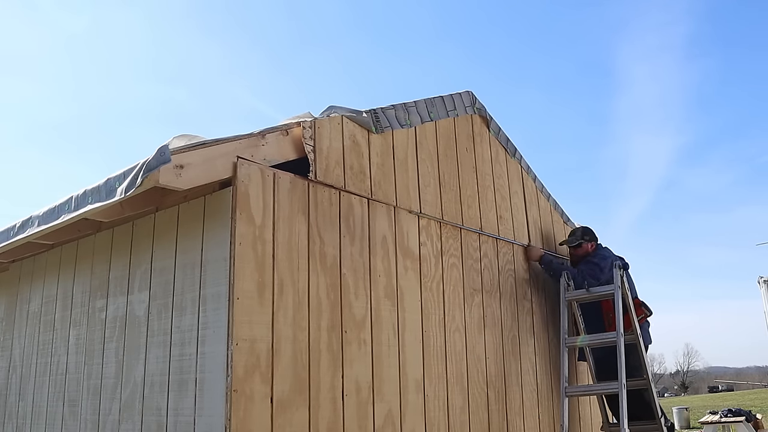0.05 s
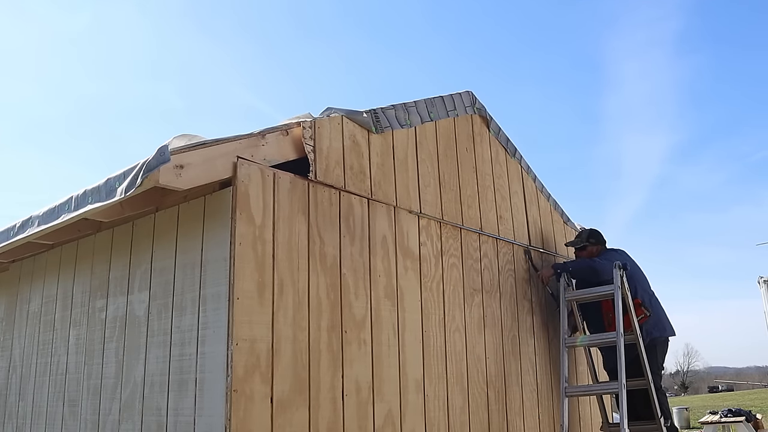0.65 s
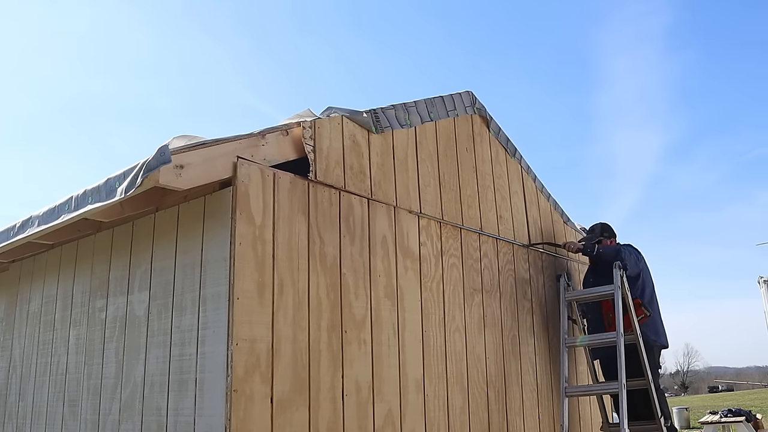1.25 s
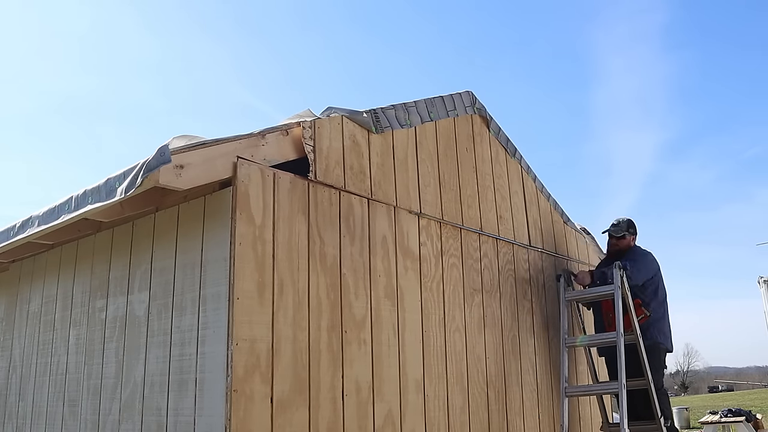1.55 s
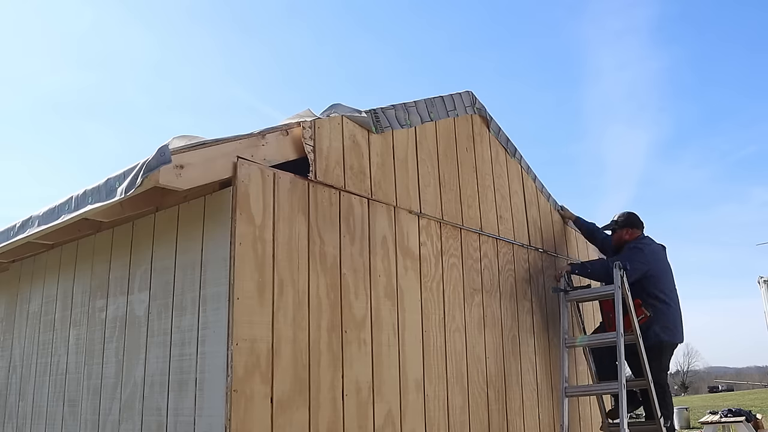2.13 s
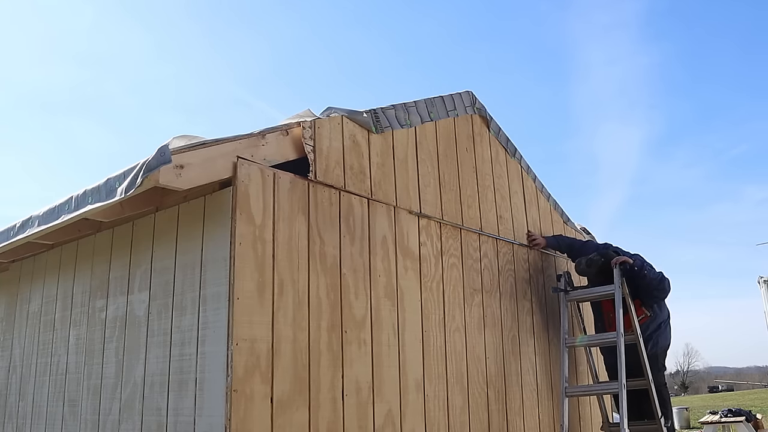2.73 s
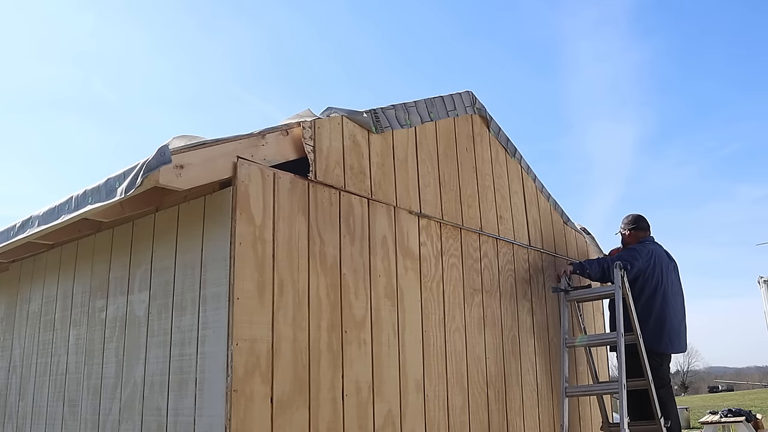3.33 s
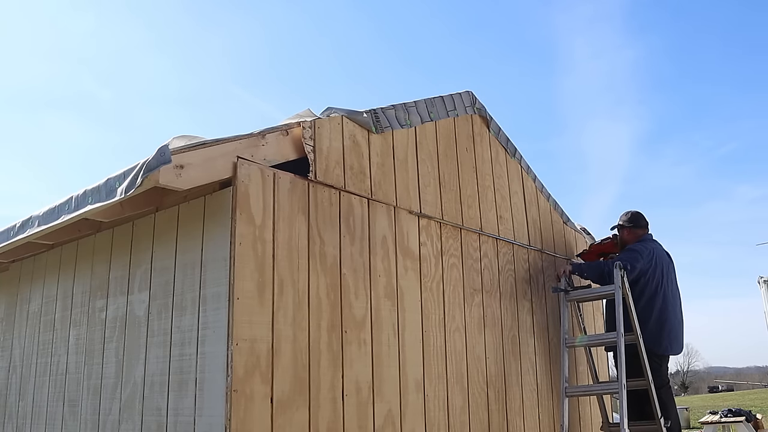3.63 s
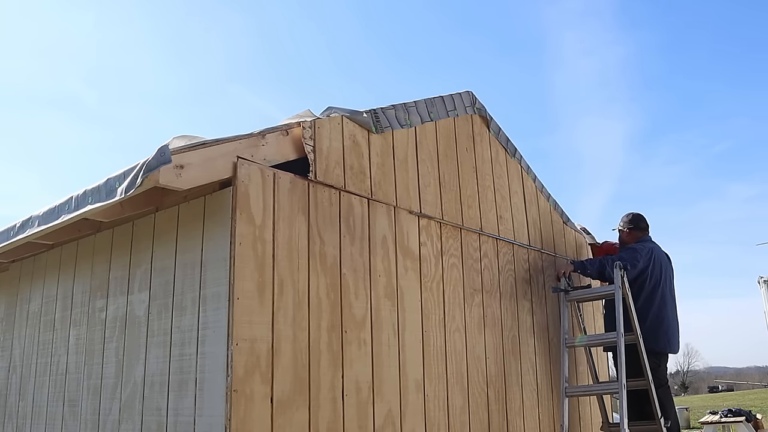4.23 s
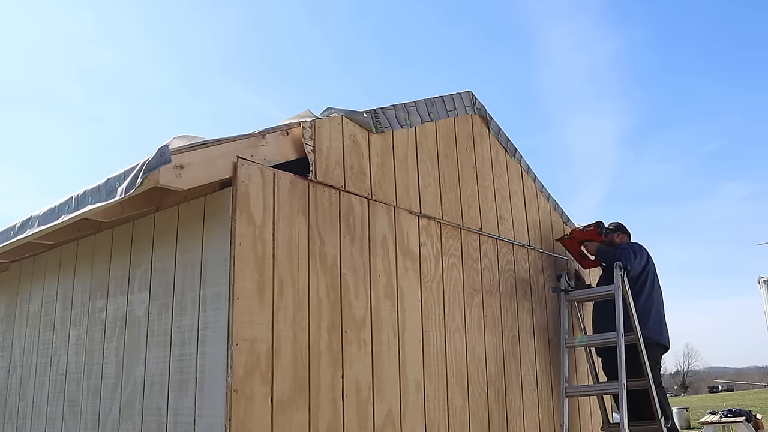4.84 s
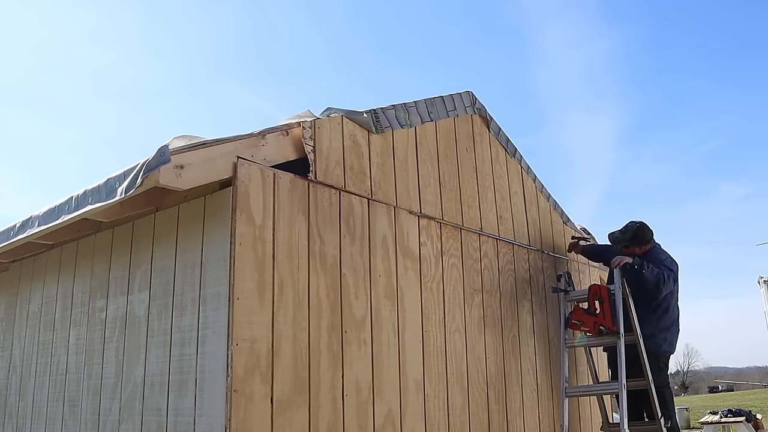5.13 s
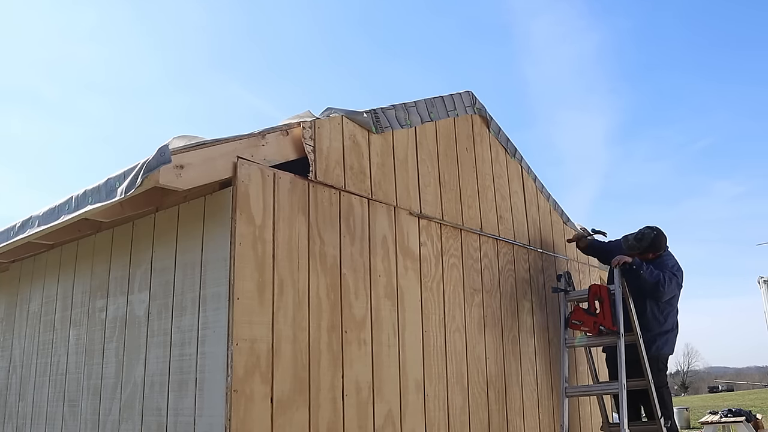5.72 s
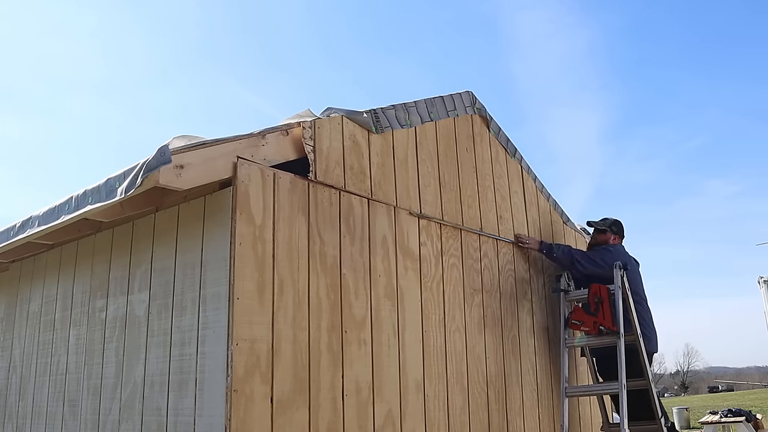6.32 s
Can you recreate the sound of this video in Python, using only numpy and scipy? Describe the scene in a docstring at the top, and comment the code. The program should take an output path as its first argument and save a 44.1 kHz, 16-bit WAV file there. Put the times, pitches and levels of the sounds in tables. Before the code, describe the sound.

Thin metal flashing is worked against wooden siding outdoors, heard dry and in mono over faint air. It opens with light ticks, a soft rustle and a thin far whine. From about 0.4 to 0.9 seconds come short rattles of very fast blows, ringing briefly and thumping the boards. A quick run of taps at 1.4 seconds ends in two sharp clicks. Duller knocks follow from 1.9 to 2.7 seconds, strongest near 2.4, with rustling and ticks as the sheet shifts. From 3.2 to 5 seconds, about thirteen sharp clicks, each different in tone, sound over a soft bright hiss. A faint whistle bends down, then a rapid run of taps lasts from 5.2 to 5.8 seconds, its ring tightening as the hiss fades. Only faint air, a tick and the far whine remain until a small click at 6.5 seconds.

```python
"""Light ticks and a rustle, then quick rattles: thin metal flashing is worked against a shed's wooden siding.
Rattles of blows in very quick succession, runs of taps, duller knocks and single sharp clicks each give a crack
and a short ring of the sheet; some blows also thump the boards. Underneath, a rustle swells as the sheet is
shifted, and ducks with the faint air under loud runs. A stretch of hiss and a thin far whine complete the
outdoor scene, heard in mono."""
import sys
import numpy as np
from scipy import signal
from scipy.fft import rfft, irfft
from scipy.io import wavfile
from scipy.ndimage import uniform_filter1d

SR = 44100
rng = np.random.default_rng(int(sys.argv[2]) if len(sys.argv) > 2 else 0)


def digitize_waveform(pressure):
    """Quantize a signal to 16-bit integers and store it at the path in sys.argv[1].

    Rows of a 2-D input are taken as channels; values are limited to [-1, 1].
    """
    field = np.atleast_2d(pressure).T
    bounded = np.clip(field, -1, 1)
    quanta = np.round(bounded * 32767).astype(np.int16)
    wavfile.write(sys.argv[1], SR, quanta)


N = 289737
EDGE_HZ, SIZE = 16100, 4096  # top of the band; samples in one blow
HZ, AGE = np.fft.rfftfreq(SIZE, 1 / SR), np.arange(SIZE) / SR
TIME, LONG_HZ = np.arange(N) / SR, np.fft.rfftfreq(N, 1 / SR)

# resonances of the sheet on the wall: pitch_hz, boost_db
SHEET_MODES = [(1085, 13), (1385, 12), (2030, 8.5), (2220, 5.5), (2530, 6), (2790, 12), (3150, 4),
               (3385, 8), (4320, 6), (4450, 8), (5600, 4.5), (5870, 4.5), (6130, 4.5), (6630, 3)]
# single sharp clicks: start_s, crack_db, tilt_db_per_octave, favoured_hz, looseness_db
CLICK_HITS = [(1.597, -5, 1, 12500, -1.5), (1.6334, -4.5, -3, 12700, -5), (2.9692, -15.5, -5, 9900, -10),
              (3.224, -5, -2, 8000, -2.5), (3.3504, -3, 0.3, 6140, -3), (3.4781, -2.5, -2, 5400, -4.5),
              (3.5953, -2.5, 0.5, 4670, -2.5), (3.7258, -5, -1, 880, -2), (3.8554, -3, 0.5, 4500, -2),
              (4.018, -3.5, 0, 4950, -1.5), (4.2131, -3, -0.26, 11500, -1.5), (4.3458, -4, 0.5, 1720, -4),
              (4.5813, -3, -0.4, 6240, -1), (4.7287, -2, 2.5, 3380, -3), (4.8627, -3, 0.3, 1500, -3),
              (5.0498, -7, -1.5, 5500, -6.5), (6.541, -21, -4, 9050, -8.5)]
# EQ of the sheet's ring after a knock or a light touch: frequency_hz, gain_db
KNOCK_RING_EQ = [(80, -22), (700, -13), (1060, -1), (1400, -5.5), (2400, 1), (2800, -6), (3450, 2),
                 (5500, -3), (14000, -4.5)]


def amp(db):
    """Decibels to gain."""
    return 10 ** (np.asarray(db) / 20)


def unit(x):
    """Scales a sound to energy 1."""
    return x / np.sqrt(np.sum(x ** 2) + 1e-20)


def eq(points, hz):
    """Gain of an EQ curve on a log-frequency axis, rolling off above the band edge."""
    point_hz, db = np.transpose(points)
    rolloff_db = np.maximum(hz - EDGE_HZ, 0) / 200
    return amp(np.interp(np.log(hz + 1), np.log(point_hz), db) - rolloff_db)


def curve(rows, column, t=TIME):
    """One column of a time table at the times t."""
    rows = np.array(rows)
    return np.interp(t, rows[:, 0], rows[:, column])


def add(mix, s, sound):
    """Mixes a sound in at time s."""
    part = mix[max(round(s * SR), 0):][:len(sound)]
    part += sound[:len(part)]


def colour(x, gain):
    """Minimum-phase filter with the given gain; the result fades out and has energy 1."""
    log_gain = np.log(gain + 1e-6)
    mirrored = np.r_[log_gain, log_gain[-2:0:-1]]
    response = np.exp(np.conj(signal.hilbert(mirrored)))[:len(HZ)]
    fade = np.cos(np.pi / 2 * np.arange(SIZE) / SIZE) ** 2
    return unit(fade * irfft(rfft(x) * response))


def tilt(db_per_octave):
    """Gain that brightens or dulls a blow above the low mids."""
    return amp(db_per_octave * np.log2(1 + HZ / 700))


def favour(hz, db, octaves):
    """Gain of a broad hump: each spot of the sheet favours its own pitch."""
    return amp(db * np.exp(-(np.log2((HZ + 1) / hz) / octaves) ** 2))


def flatten(x, keep):
    """Evens out a burst's spectrum, keeping its timing and a share of its ripple."""
    spectrum = rfft(x)
    return irfft(spectrum / (abs(spectrum) + 1e-9) ** (1 - keep))


def noise(gain):
    """Steady noise of rms 1 with the given gain over frequency."""
    return unit(irfft(rfft(rng.standard_normal(N)) * gain, N)) * np.sqrt(N)


def wander(rate_hz):
    """Random drift of rms 1, up to about the given rate."""
    return noise(np.exp(-(LONG_HZ / rate_hz) ** 2))


def shifting(t):
    """Strength of the rustling at the times t: each shift of the sheet swells and fades."""
    # shifts of the sheet: middle_s, half_length_s, level_db
    shifts = [(0, .05, -54), (0.232, 0.049, -58), (0.82, .03, -62.5), (1.298, .045, -58.5),
              (1.844, 0.088, -68), (2.056, .04, -60.5), (2.395, 0.24, -57), (2.906, 0.12, -67),
              (3.77, .2, -64), (5.297, 0.3, -69.5)]
    return sum(amp(db) * np.exp(-((t - s) / half) ** 2) for s, half, db in shifts)


def rustle_and_air(rustle_db=-2.0, rest_db=-77, gust_db=5.5, air_db=-64.0, rub_db=-8):
    """A gusty low rustle and a little bright rubbing follow the shifts, over even, faint air."""
    # EQ of the rustle: frequency_hz, gain_db
    rustle_eq = [(30, -23.5), (110, -6.5), (280, 4.5), (1200, 1), (3000, -8.5), (9000, -37.5)]
    # EQ of the air and the rubbing: frequency_hz, gain_db
    air_eq = [(30, 12.5), (200, -2.5), (1500, 9.5), (3500, 5.5), (16000, 4.5)]
    shift = shifting(TIME)
    rustle = noise(eq(rustle_eq, LONG_HZ)) * amp(gust_db * wander(rate_hz=50))
    air = noise(eq(air_eq, LONG_HZ)) * amp(wander(rate_hz=91))
    return (amp(rest_db) + amp(rustle_db) * shift) * rustle + (amp(air_db) + amp(rub_db) * shift) * air


def duck(key, threshold_db=-39, knee_db=2, depth_db=21, fall_db_per_s=56.5, rise_db_per_s=122.5):
    """Gain that falls steadily while the key sound is loud and recovers when it stops."""
    step, lag_s = 64, .025
    power = abs(uniform_filter1d(key ** 2, size=1400)[::step])
    level_db = 10 * np.log10(power + 1e-12)
    cut_db, track = 0, []
    for busy in .5 + .5 * np.tanh((level_db - threshold_db) / knee_db):
        cut_db += (busy * fall_db_per_s - (1 - busy) * rise_db_per_s) * step / SR
        cut_db = min(max(cut_db, 0), depth_db)
        track.append(cut_db)
    return amp(-np.interp(TIME - lag_s, TIME[::step], track))


def whine(overtone_db=-13, waver=0.0046):
    """A thin wavering tone and its octave glide in and out of hearing."""
    # brief squeaks and a thin far whine: start_s, end_s, start_hz, end_hz, level_db
    glides = [(0.021, 0.024, 6140, 6100, -47), (0.036, 0.041, 6260, 6080, -51),
              (.198, .205, 12600, 12900, -49), (0, 0.412, 1324, 1403, -68.5),
              (4.68, 4.838, 2240, 2430, -64), (5.943, 6.051, 1656, 1800, -71.5),
              (6.04, 6.573, 1445, 1514, -76.5)]
    # a whistle that swells and bends down before the long run of taps: time_s, pitch_hz, level_db
    whistle = [(4.87, 2145, -64), (5.02, 2195, -63), (5.108, 2240, -56.5), (5.145, 1880, -58.5)]
    out, unsteady = np.zeros(N), 1 + waver * wander(rate_hz=45)
    paths = [[(start, start_hz, db), (end, end_hz, db)] for start, end, start_hz, end_hz, db in glides]
    for path in paths + [whistle]:
        t = np.arange(path[0][0], path[-1][0], 1 / SR)
        phase = 2 * np.pi * np.cumsum(curve(path, column=1, t=t) * unsteady[:len(t)]) / SR
        level = amp(curve(path, column=2, t=t)) * signal.windows.tukey(len(t), .2)
        add(out, t[0], level * np.sqrt(2) * (np.sin(phase) + amp(overtone_db) * np.sin(2 * phase)))
    return out


def hiss(lull_db=6, treble_lull_db=7, lull_s=0.0093, flutter_db=1):
    """A bright hiss whose bands flutter apart; it dips just before each click, most in the treble."""
    # EQ of the hiss: frequency_hz, gain_db
    hiss_eq = [(1000, -2.5), (9500, -1), (11200, 3), (13300, -1), (14700, 2.5), (15120, 6), (15450, -12)]
    # envelope of the hiss: time_s, level_db
    envelope = [(3.21, -74), (3.23, -53), (4.3, -54.8), (4.42, -50.5), (4.75, -51.5), (5.12, -47),
                (5.76, -67), (5.8, -102)]
    lull = sum(np.exp(-((TIME - s + 0.011) / lull_s) ** 2) for s, *_ in CLICK_HITS)
    centres = np.linspace(0, EDGE_HZ, 6)
    bands = [np.exp(-((LONG_HZ - hz) / 2600) ** 2) for hz in centres]
    spectrum = rfft(noise(eq(hiss_eq, LONG_HZ))) / sum(bands)
    out = np.zeros(N)
    for hz, band in zip(centres, bands):
        dip_db = (lull_db + treble_lull_db * hz / EDGE_HZ) * lull
        out += irfft(spectrum * band, N) * amp(flutter_db * wander(rate_hz=22) - dip_db)
    gate = (TIME > envelope[0][0]) & (TIME < envelope[-1][0])
    return out * amp(curve(envelope, column=1)) * gate


def hiss_rings():
    """Two narrow bands of noise ring out in the hiss, one sliding up and one down."""
    # resonances in the hiss: start_s, end_s, start_hz, end_hz, width_hz, level_db
    sweeps = [(4.2, 4.35, 3500, 4100, 60, -67), (3.22, 4.0, 12300, 11000, 700, -63)]
    out = np.zeros(N)
    for start, end, start_hz, end_hz, width_hz, db in sweeps:
        hz = np.linspace(start_hz, end_hz, round((end - start) * SR))
        band = np.sqrt(2) * wander(rate_hz=width_hz)[:len(hz)] * np.sin(2 * np.pi * np.cumsum(hz) / SR)
        add(out, start, amp(db) * signal.windows.tukey(len(hz), .2) * band)
    return out


def sheet_resonance(depth, width_hz=100):
    """Gain of the sheet's resonances; depth is how strongly a blow wakes them."""
    peaks = sum(amp(db) ** 2 / (1 + (2 * (HZ - hz) / width_hz) ** 2) for hz, db in SHEET_MODES)
    return (1 + peaks) ** (depth / 2)


def sheet_partials(gain, phase, scatter_db=2, flex=.004):
    """The sheet's modes as clean tones; strength and pitch vary from blow to blow as it flexes."""
    hz, db = np.transpose(SHEET_MODES)
    strength, bend = rng.standard_normal((2, len(hz)))
    levels = amp(db + scatter_db * strength) * np.interp(hz, HZ, gain)
    cycles = np.outer(hz * (1 + flex * bend), AGE) + phase[:, None]
    return levels @ np.sin(2 * np.pi * cycles)


def ticks(t60_s=0.026, snap=3.4, touch_db=10, favour_db=8, crackle_db=20, spread_db=12, count=220):
    """Light touches: a few distinct, each with its own pitch, and faint crackle as the sheet shifts."""
    # light touches of the sheet: start_s, relative_db, favoured_hz
    distinct = [(0.007, -38, 6030), (0.175, -33.5, 5900), (0.779, -36.5, 3400), (0.903, -33.5, 11400),
                (0.957, -39, 2620), (1.617, -37, 4000), (1.822, -37, 7700), (1.935, -36, 10500),
                (2.133, -34, 12300), (2.282, -33, 6160), (2.83, -32.5, 10300), (2.851, -33.5, 9850),
                (2.905, -37, 4340), (3.066, -30.5, 8000), (3.075, -31.5, 3100), (3.448, -31, 3010),
                (3.563, -34.5, 4050), (3.69, -30.5, 3470), (3.831, -29.5, 1080), (6.073, -38, 5720)]
    out, gain = np.zeros(N), eq(KNOCK_RING_EQ, HZ) * sheet_resonance(depth=0.31)
    touches = [(s, db + touch_db, tilt(2.1) * favour(hz, favour_db, octaves=0.28))
               for s, db, hz in distinct]
    progress = np.cumsum(shifting(TIME))  # crackle is densest where the shifts are strongest
    for place, size in rng.random((count, 2)):
        s = np.interp(place * progress[-1], progress, TIME)
        touches.append((s, 20 * np.log10(shifting(s)) + crackle_db + spread_db * size ** 2, tilt(7.6)))
    envelope = amp(-60 * AGE / t60_s) + snap * np.exp(-AGE / 0.0011)
    for s, db, tone in touches:
        add(out, s, amp(db) * colour(rng.standard_normal(SIZE) * envelope, gain * tone))
    return out


def thumps(push_s=0.00068):
    """The boards give one short low push and do not ring."""
    # blows that press the sheet home against the boards: start_s, peak_db
    hits = [(.3915, -41), (0.4314, -36.5), (0.489, -35), (0.5005, -35.5), (.5643, -36.5), (.851, -35),
            (1.448, -36), (1.5331, -42.5), (6.54, -49)]
    out, u = np.zeros(N), AGE / push_s
    push = u * (2 - u) * np.exp(-u)
    for s, db in hits:
        add(out, s, amp(db) * push / push.max())
    return out


def blows(hits, crack_eq, ring_eq, crack_s, swell_s, ring_t60, late_db, depth, alike,
          ring_db, modes_db, slap_db, favour_db, mode_t60=0.054, late_t60=0.17, pinning=1.76):
    """Each blow is a brief crack, then a diffuse ring through sheet and wall with clear modes on top."""
    out = np.zeros(N)
    alike = np.array([[alike], [alike ** 3]])  # cracks repeat more closely than rings
    spot = rng.standard_normal((2, SIZE))  # blows on one spot share their fine pattern
    phase = rng.random(len(SHEET_MODES))
    crack_gain, ring_gain, resonance = eq(crack_eq, HZ), eq(ring_eq, HZ), sheet_resonance(depth)
    for s, db, bright, hz, loose_db in hits:
        tone = tilt(bright) * favour(hz, favour_db, octaves=0.51)
        contact, spread = np.sqrt(alike) * spot + np.sqrt(1 - alike) * rng.standard_normal((2, SIZE))
        snap = flatten(contact * np.exp(-AGE / crack_s), keep=.65)
        crack = amp(db) * colour(snap, crack_gain * tone)
        add(out, s, crack)
        add(out, s + rng.uniform(0.0039, .008), amp(slap_db) * crack)  # the sheet slaps the boards
        age = AGE / amp(0.31 * loose_db)  # ring times hold at looseness 0 dB and shrink when pinned
        swell = 1 - np.exp(-(age / swell_s) ** 2)
        decay = amp(-60 * age / ring_t60) + amp(late_db - 60 * age / late_t60)
        ring_tone = ring_gain * tone * tilt(-0.11 * loose_db)
        ring = colour(spread * swell * decay, ring_tone * resonance)
        modes = unit(sheet_partials(ring_tone, phase) * swell * amp(-60 * age / mode_t60))
        add(out, s, amp(db + loose_db + ring_db) * ring)
        add(out, s, amp(db + pinning * loose_db + modes_db) * modes)  # pinning mutes the modes most
    return out


def runs(table, accent_db, fade_db, pin_db, scatter_db, jitter_s, quicken=0):
    """Spells runs out as blows that fade; each pins the sheet by a further pin_db, so it rings less."""
    hits = []
    for first, last, count, db, bright, hz, loose_db in table:
        for k, u in enumerate(np.linspace(0, 1, round(count))):
            force, edge, late = rng.standard_normal(3)
            s = first + (last - first) * (u + quicken * u * (1 - u)) + jitter_s * late * (0 < u < 1)
            strength_db = db + accent_db * (k == 0) - fade_db * k + scatter_db * force
            hits.append((s, strength_db, bright + scatter_db * edge, hz, loose_db - pin_db * k))
    return hits


def knocks():
    """Duller knocks: a longer contact, a strong slap back and prominent modes."""
    # runs of knocks: first_s, last_s, count, crack_db, tilt_db_per_octave, favoured_hz, looseness_db
    bursts = [(.2882, .2882, 1, -22.5, 1, 12000, -2), (1.906, 1.906, 1, -17.5, -0.5, 7000, -8.5),
              (2.0546, 2.0988, 2, -16.5, 2.2, 12000, -6.5), (2.1995, 2.2387, 2, -13, -2.3, 11000, -9.5),
              (2.3433, 2.3699, 2, -11.5, -2, 1100, -7), (2.4114, 2.5205, 4, -3, -1, 2080, -7.5),
              (2.6273, 2.6514, 2, -18, 0.1, 4000, -10)]
    # EQ of a knock's crack: frequency_hz, gain_db
    crack_eq = [(80, -15), (760, -8.5), (1120, 4.5), (1600, -8), (2150, -1), (2650, -1.5), (3450, 0.5),
                (5200, -5.5), (6200, -2.5), (11500, -3), (13500, -2.5)]
    hits = runs(bursts, accent_db=-1.5, fade_db=0.5, pin_db=0.1, scatter_db=0.12, jitter_s=0.00025,
                quicken=-.07)
    return blows(hits, crack_eq, KNOCK_RING_EQ, crack_s=0.0013, swell_s=0.0026, ring_t60=0.026,
                 late_db=-18.5, depth=0.54, alike=0.77, ring_db=4.5, modes_db=5.5, slap_db=-12.5,
                 favour_db=2.0)


def rattles():
    """Short bursts of hammer blows on the sheet in very quick succession, heard as a rattle."""
    # rattles: first_s, last_s, count, crack_db, tilt_db_per_octave, favoured_hz, looseness_db
    bursts = [(.3707, .4312, 7, -7, 0.15, 5500, -11), (.4784, .5215, 5, -9, -0.4, 4500, -14.5),
              (.5643, .5971, 4, -8, 1.5, 11000, -12), (.6154, .6458, 4, -6.5, 2.5, 12000, -12),
              (.8365, .865, 3, -6, -1.7, 4800, -7.5)]
    # EQ of a rattle's crack: frequency_hz, gain_db
    crack_eq = [(80, -3.5), (450, 1.5), (900, 0.5), (2800, 2), (4000, -2.5), (5500, 2), (9000, -4.5),
                (13000, -1.5)]
    # EQ of its ring: frequency_hz, gain_db
    ring_eq = [(80, 3.5), (600, -10.5), (1100, 8), (3200, 9), (6500, 5.5), (14000, 4)]
    hits = runs(bursts, accent_db=1.5, fade_db=0.38, pin_db=0.0, scatter_db=1.0, jitter_s=.0005)
    return blows(hits, crack_eq, ring_eq, crack_s=0.00066, swell_s=0.00063, ring_t60=0.036, late_db=-18,
                 depth=0.19, alike=0.39, ring_db=3.5, modes_db=-1.5, slap_db=-23, favour_db=1.5)


def taps():
    """Fast runs of near-identical taps; the ring tightens as they pin the sheet down."""
    # runs of taps: first_s, last_s, count, crack_db, tilt_db_per_octave, favoured_hz, looseness_db
    bursts = [(1.413, 1.5338, 8, -3.5, 0.1, 13400, -2.8), (5.1569, 5.2226, 4, -4.5, 0.3, 3020, -2),
              (5.2495, 5.5132, 12, -4, 0.6, 6900, -4), (5.537, 5.7715, 11, -5, 0.29, 6640, -6)]
    # EQ of a tap's crack: frequency_hz, gain_db
    crack_eq = [(80, -10.5), (2100, -10.5), (3000, -1), (3550, -7), (4300, 2.5), (5150, -6.5), (5900, 2.5),
                (6900, -0.5), (7600, 1.5), (8300, -3.5), (9400, -2), (14000, -8.5)]
    # EQ of its ring: frequency_hz, gain_db
    ring_eq = [(80, -14.5), (600, -9), (1100, -9), (3200, -0.5), (6500, -2.5), (14000, -6.5)]
    hits = runs(bursts, accent_db=-0.5, fade_db=0.14, pin_db=0.37, scatter_db=0.7, jitter_s=.0004)
    return blows(hits, crack_eq, ring_eq, crack_s=0.00077, swell_s=0.0025, ring_t60=0.047, late_db=-33.5,
                 depth=0.54, alike=0.85, ring_db=0.6, modes_db=0, slap_db=-18, favour_db=3.0)


def clicks():
    """Single sharp clicks, each different: a very short contact, then a dry, noisy ring."""
    # EQ of a click's crack: frequency_hz, gain_db
    crack_eq = [(80, -4.5), (1000, -5), (2400, -3), (3700, 1.5), (5300, -4.5), (8000, 2), (11000, -2.5),
                (14500, -0.5)]
    # EQ of its ring: frequency_hz, gain_db
    ring_eq = [(80, -7), (600, -5), (1100, -1.5), (3200, 3), (6500, 2.5), (14000, 4)]
    return blows(CLICK_HITS, crack_eq, ring_eq, crack_s=0.00027, swell_s=0.0057, ring_t60=0.036,
                 late_db=-54, depth=0.36, alike=0, ring_db=-0.7, modes_db=-16, slap_db=-18, favour_db=5.5)


def scene():
    """All the work happens at one place on the wall, the same in both channels."""
    work = rattles() + taps() + knocks() + clicks() + thumps()
    mono = work + duck(work) * rustle_and_air() + ticks() + hiss() + hiss_rings() + whine()
    return np.array([mono, mono])


def record(dry):
    """A steep low-pass at the top of the band."""
    lowpass = signal.firwin(255, EDGE_HZ, window=("kaiser", 8), fs=SR)
    return signal.oaconvolve(dry, lowpass[None], "same", axes=1)


dry = scene()
out = record(dry)
digitize_waveform(out)
```